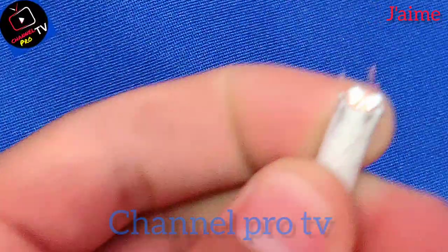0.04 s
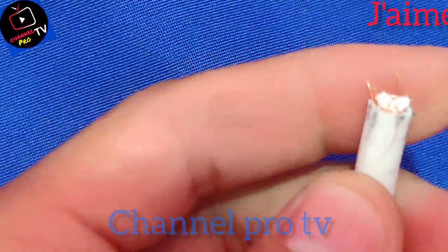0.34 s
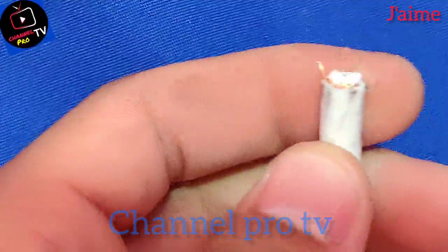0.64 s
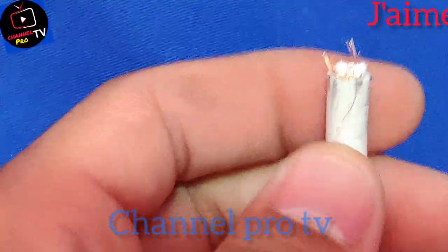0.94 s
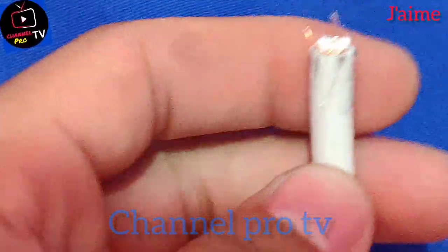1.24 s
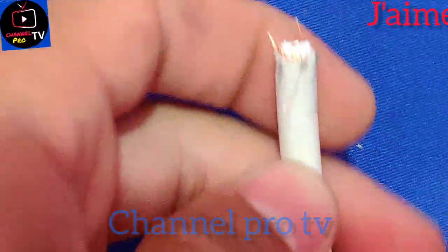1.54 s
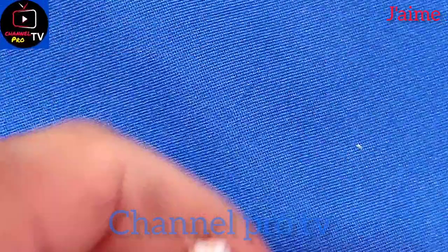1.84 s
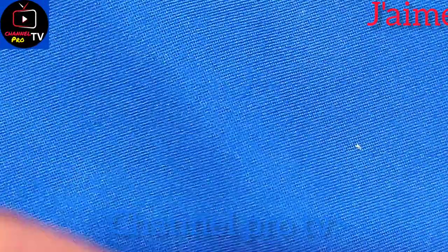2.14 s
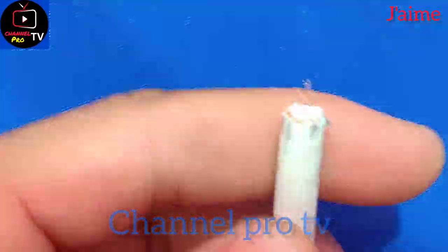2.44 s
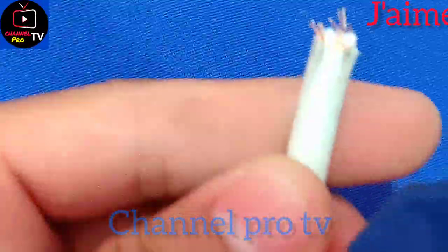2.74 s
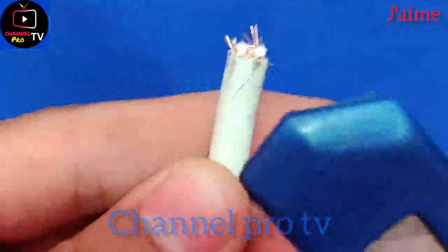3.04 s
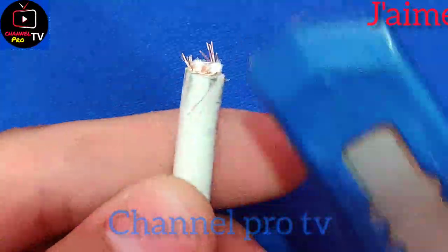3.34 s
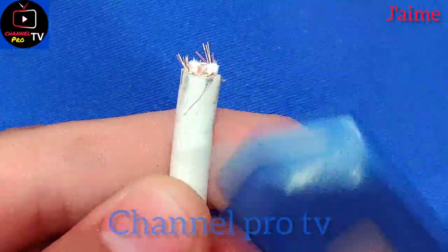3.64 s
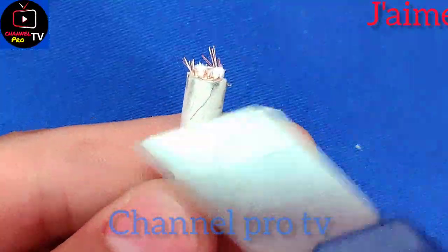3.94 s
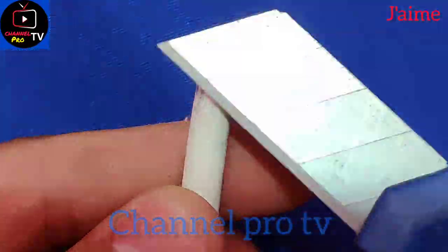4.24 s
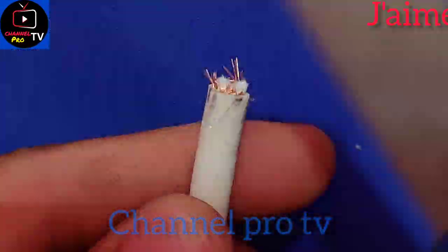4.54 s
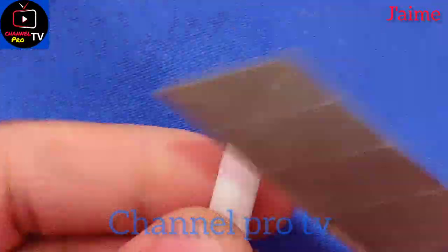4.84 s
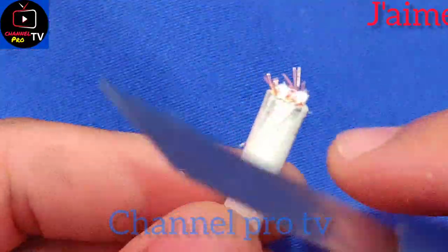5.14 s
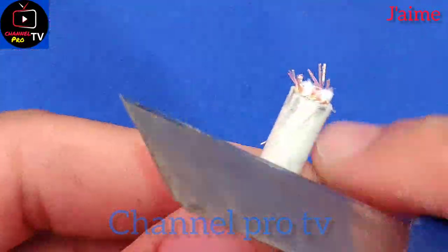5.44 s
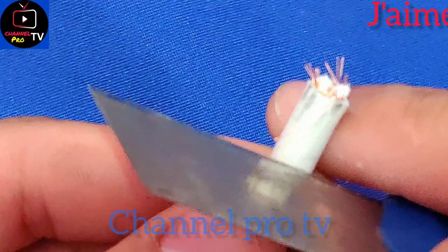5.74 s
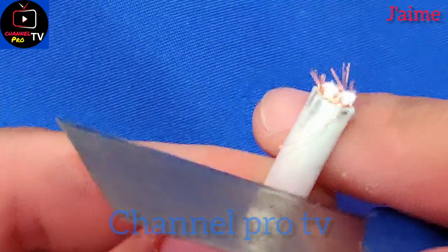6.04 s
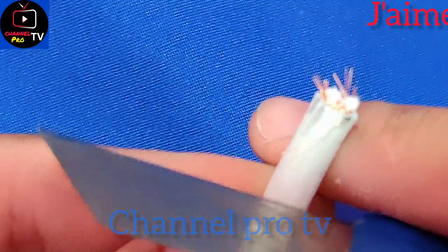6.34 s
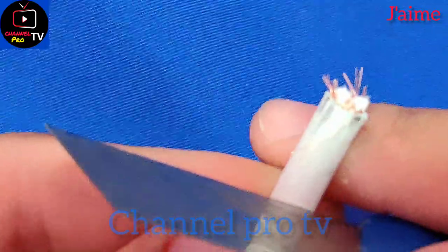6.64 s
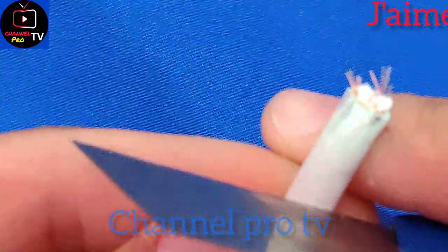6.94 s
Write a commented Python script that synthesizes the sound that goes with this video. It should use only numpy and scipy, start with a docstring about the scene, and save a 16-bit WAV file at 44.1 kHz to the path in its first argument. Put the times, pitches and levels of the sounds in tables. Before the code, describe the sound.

Hands softly rub and bump as they turn a cable over a cloth-covered table. A plastic snap-off knife is picked up with light ticks and one sharp knock. Its blade is pushed out in a run of loud, uneven ratcheting clicks, then gives a few faint ticks against the cable's jacket. Everything is close to the microphone in a quiet room with soft hiss and low hum.

```python
"""Hands softly rub and bump as they turn a coaxial cable over a cloth-covered table, close by in a quiet room.
A plastic snap-off knife is picked up with light ticks and one sharp knock. Its blade is pushed out in
loud ratcheting clicks: the slider's catch slips off each tooth and snaps into the next notch, ringing
the handle. Then the blade scores the cable's jacket with a few faint ticks.
Underneath lie a soft hiss, a mains hum and the low rumble of handling."""
import sys
import numpy as np
from scipy import signal
from scipy.fft import rfft, irfft, next_fast_len
from scipy.io import wavfile
from scipy.ndimage import uniform_filter1d

SR = 44100
rng = np.random.default_rng(int(sys.argv[2]) if len(sys.argv) > 2 else 0)


def file_out(sig):
    """Save sig as 16-bit WAV at sys.argv[1]."""
    # one column per channel
    cols = np.atleast_2d(sig).T
    # limit, then scale
    lim = np.clip(cols, -1, 1)
    pcm = np.round(lim * 32767).astype(np.int16)
    wavfile.write(sys.argv[1], SR, pcm)


N = 312669
TIME = np.arange(N) / SR

# the tone colour (strength from bass to treble) of a light touch: pitch_hz, level_db
TOUCH_COLOUR = [(200, -5), (600, -14), (1000, -13), (1500, -4.5), (2200, -3.5), (3000, -1), (4000, 2.5),
                (5500, -3), (7500, -1), (10000, -8.5), (12500, -12.5), (15500, -14)]
# the tone colour of the handling rumble: pitch_hz, level_db
RUMBLE_COLOUR = [(8, 7), (22, -13), (38, -4), (70, -3.5), (110, -11), (280, -15.5), (400, -25.5),
                 (1000, -36.5), (4000, -60)]
# how alike left and right are for close sounds: pitch_hz, likeness (1 = the same)
NEAR_LIKENESS = [(200, 0.96), (1000, 0.56), (2500, 0.49), (4500, 0.18), (7000, .25), (15000, 0.22)]
# how alike they are for the background: pitch_hz, likeness
AIR_LIKENESS = [(40, 0.53), (150, 0.93), (400, .5), (1000, 0.29), (3000, .1), (15000, .1)]


def slider(level_db, top_pan_db, room_db):
    """The slider ratchets along the handle; the highest part of its snaps beams to the left."""
    # the tone colour of a snap: pitch_hz, level_db
    colour = [(110, -12.5), (220, -11), (370, -27), (600, -29), (1000, -14.5), (1500, -3), (2200, -.6),
              (3000, -.3), (4000, 0.5), (5500, -0.5), (7500, 3), (10000, -1), (12500, -3), (15500, -5)]
    near, spread = clicks(notch_contacts(), colour, rise_ms=0.11, ring_width_hz=300,
                          scrape_db=-20, scrape_ms=1.3)
    padded = next_fast_len(N)
    pan_db = at_hz([(8800, 0), (12500, top_pan_db)], np.fft.rfftfreq(padded, 1 / SR))
    spectrum = rfft(knife_body(near), padded)
    beamed = irfft(spectrum * from_db([pan_db / 2, -pan_db / 2]), padded)[:, :N]
    direct = from_db(level_db) * close_echoes(beamed, left_lag_ms=0.064)
    return direct, from_db(room_db) * knife_body(spread)


def notch_contacts():
    """At each notch the catch slips off a tooth, snaps into place and bounces back once."""
    # the notches: slip_s, slip_db, slip_decay_ms, snap_s, snap_db, snap_decay_ms,
    # bass_db, treble_db, ring_hz, ring_db, pan_db (above 0 is left)
    notches = [(3.573, -11, 2.6, 3.583, -10.5, 2.4, -2.5, -3.5, 6030, 7.5, -5.5),
               (3.7149, -10.5, 1, 3.7189, -11.5, 3.07, -1, .5, 7240, 9, -0.5),
               (3.7366, -20, 4.7, 3.7394, -15, 3.8, -4, 0, 7150, 5.5, -4.5),
               (3.798, -31, 5, 3.8041, -13.5, 4.54, -2, 2.5, 7130, 9, -3),
               (3.93, -25, 5.8, 3.9345, -8.5, 3.36, -6.5, 1, 7550, 8.5, -5.5),
               (4.1413, -17.5, 10.6, 4.153, -13.5, 7, -.5, -.5, 3000, 7, -2),
               (4.2588, -14.5, 3.6, 4.268, -13.5, 5.2, -1, 2.5, 2740, 9, -3.5),
               (4.273, -8.5, 2.45, 4.2761, -10.5, 2.2, -2.5, 1, 2520, 5, -7),
               (4.3265, -32.5, 2, 4.3281, -14, 1.34, -3, 3.5, 4740, 14, -7.5),
               (4.3806, -19, 1.5, 4.3886, -14, 5.2, -3, 2.5, 3900, 8, -8.5)]
    handle_ring_hz, handle_ring_db = 2950, 7
    contacts = []
    for slip_s, slip_db, slip_ms, snap_s, snap_db, snap_ms, *tone in notches:
        bass_db, treble_db, _, _, pan_db = tone
        # the bounce is weaker and duller, and rings the handle
        bounce_s = snap_s + 1.2 * snap_ms / 1000
        bounce_tone = (bass_db, treble_db - 5, handle_ring_hz, handle_ring_db, pan_db)
        contacts += [(slip_s, slip_db, slip_ms, *tone),
                     (snap_s, snap_db, snap_ms, *tone),
                     (bounce_s, snap_db - 10.5, snap_ms, *bounce_tone)]
    return contacts


def knife_body(sound):
    """Snaps ring on in the handle and the blade."""
    # the knife's own notes: pitch_hz, width_hz, level_db
    rings = [(2334, 150, 1), (2885, 63, -1.5), (3520, 45, -3.5), (3890, 31, -15), (5090, 73, -4),
             (6660, 45, -11), (7280, 160, -5.5), (8300, 80, 1.5), (10200, 73, -5)]
    return sound + sum(from_db(db) * resonate(sound, hz, width_hz) for hz, width_hz, db in rings)


def knife_lift(room_db):
    """The knife gives one sharp knock as it is lifted."""
    # the knock's two contacts: start_s, level_db, decay_ms, bass_db, treble_db, ring_hz, ring_db, pan_db
    contacts = [(2.6342, -34, 12, 3.5, 8, 4700, 1.5, 0), (2.6391, -16.5, 2.2, -8, 7, 4050, 9, 2)]
    # the tone colour of the knock: pitch_hz, level_db
    colour = [(200, -14.5), (550, -34), (850, -12.5), (1150, -11.5), (1900, -9.5), (3000, -3.5), (5000, 0),
              (6500, -2), (8300, 3), (9400, -7), (12500, -18), (14200, -13), (16000, -22)]
    near, spread = clicks(contacts, colour, rise_ms=0.19, ring_width_hz=100, scrape_db=-13, scrape_ms=1)
    return close_echoes(near, left_lag_ms=0.024), from_db(room_db) * spread


def touches(level_db, room_db):
    """The knife ticks as it is picked up, gripped and set on the cable; brighter ticks have less bass."""
    # touches of fingers, knife and cable:
    # start_s, level_db, decay_ms, brightness_db, ring_hz, ring_db, pan_db
    ticks = [(1.586, -46.5, 11, 3, 3170, 16, -1), (1.744, -47, 6.9, -3.5, 3120, 8, -2),
             (1.7735, -41, 5.8, -1.5, 3050, 5, -1), (1.8415, -39, 10, 5, 4260, 15, 3),
             (1.8505, -36.5, 8.6, 2.5, 2720, 10.5, -2), (2.0965, -33.5, 6.2, 1.5, 8060, 8.5, -1.5),
             (2.2226, -36, 3.4, 5, 5000, 18.5, -1), (3.2, -41, 3.5, -2, 3600, 15, 5),
             (3.258, -47.5, 2.2, 1, 5300, 13, 7), (3.308, -48.5, 3.5, -1, 6170, 2, 5),
             (3.409, -52, 2.7, -6, 3600, 15.5, 3), (3.47, -41, 9, 0.5, 2860, 10.5, 1),
             (3.987, -27.5, 3.1, 6, 7500, 2, -8), (4.021, -33, 7.3, 1, 2100, 10.5, -8),
             (4.42, -30, 3.3, 2, 4130, 10, -13.5), (4.52, -39, 4.7, 5, 2150, 13.5, -3),
             (4.775, -32, 2.6, 4.5, 5700, 14.5, -.5), (4.9628, -37.5, 6.5, -0.5, 7460, 9.5, 3),
             (5.019, -49, 4.3, -6, 2470, 9, 5), (5.081, -51.5, 4.2, 4, 3780, 10.5, 0),
             (5.488, -55.5, 3.2, -1, 8700, 16, 2), (5.611, -49, 5.5, 0, 2460, 16, 4),
             (6.089, -58, 4.5, -7, 3250, 19, 0.5), (6.464, -59, 4.5, -5, 2788, 11, 1)]
    contacts = [(start_s, db, decay_ms, -bright_db, bright_db, *ring_and_pan)
                for start_s, db, decay_ms, bright_db, *ring_and_pan in ticks]
    near, spread = clicks(contacts, TOUCH_COLOUR, rise_ms=0.56, ring_width_hz=296,
                          scrape_db=-15.5, scrape_ms=4.5)
    return from_db(level_db) * blade_ring(near), from_db(room_db) * spread


def blade_ring(sound, grip_s=2.3, grip_db=-12):
    """Light touches leave thin rings in the blade, weaker once the hand closes round the knife."""
    # the free blade's notes: pitch_hz, width_hz, level_db
    rings = [(2770, 6, 10), (3080, 12, 12), (4030, 30, 2), (8200, 6, 9)]
    shaking = sound * from_db(grip_db * (TIME > grip_s))
    return sound + sum(from_db(db) * resonate(shaking, hz, width_hz) for hz, width_hz, db in rings)


def clicks(contacts, colour, rise_ms, ring_width_hz, scrape_db, scrape_ms):
    """Each contact scrapes briefly, then snaps. Returns the close sound and the sound sent to the room."""
    # where bass and treble changes act: bass_full_hz, bass_end_hz, treble_start_hz, treble_full_hz
    corners_hz = [2200, 3420, 8500, 10500]
    near, spread = np.zeros((2, 2, N))
    for snap_s, level_db, decay_ms, bass_db, treble_db, ring_hz, ring_db, pan_db in contacts:
        tilt = list(zip(corners_hz, [bass_db, 0, 0, treble_db]))
        # a burst played backwards swells into the snap
        scrape = from_db(scrape_db) * burst(colour, scrape_ms, rise_ms, tilt)[:, ::-1]
        snap = burst(colour, decay_ms, rise_ms, tilt)
        hit = from_db(level_db) * np.hstack([scrape, snap])
        start_s = snap_s - scrape.shape[1] / SR
        add(spread, start_s, hit)
        # the grip and the blade's position point one ring at the microphone
        hit = hit + (from_db(ring_db) - 1) * resonate(hit, ring_hz, ring_width_hz)
        add(near, start_s, hit * from_db([[pan_db / 2], [-pan_db / 2]]))
    return near, spread


def burst(colour, decay_ms, rise_ms, tilt=None):
    """A contact starts many vibrations at once; they die in milliseconds, the highest first."""
    ms = np.arange(4096) / SR * 1000
    hz = np.fft.rfftfreq(len(ms), 1 / SR)
    attack = 1 - np.exp(-ms / rise_ms)
    envelope = attack * np.exp(-ms / decay_ms)
    top_envelope = attack * np.exp(-ms / (0.62 * decay_ms))
    top_share = at_hz([(8000, 0), (11500, 1)], hz)
    vibrations = noise(colour, NEAR_LIKENESS, size=len(ms))
    ring = (1 - top_share) * rfft(vibrations * envelope) + top_share * rfft(vibrations * top_envelope)
    # share the blow's energy from bass to treble according to the tone colour
    wanted_power = from_db(2 * at_hz(colour, hz))
    wanted_power = wanted_power / wanted_power.mean() * np.sum(envelope ** 2)
    ring_power = uniform_filter1d(np.abs(ring) ** 2 + 1e-12, size=161)
    gain = np.sqrt(uniform_filter1d(wanted_power, size=161) / ring_power)
    gain = uniform_filter1d(gain, size=81) * from_db(at_hz(tilt, hz) if tilt else 0)
    return irfft(ring * gain, len(ms)) * (ms < ms[-1] / 2)


def table_bumps(ring_db, ring_width_hz):
    """The cloth softens knocks on the table to dull thuds."""
    # the soft knocks: start_s, level_db, decay_ms, ring_hz
    bumps = [(0.9845, -44, 7.5, 800), (1.126, -45, 6, 700), (1.8055, -44.5, 10.3, 284)]
    # the tone colour of a thud: pitch_hz, level_db
    colour = [(80, -2), (270, 3), (600, -4.5), (950, -1.5), (1250, -18.5), (3000, -24), (15000, -36)]
    out = np.zeros((2, N))
    for start_s, level_db, decay_ms, ring_hz in bumps:
        thud = burst(colour, decay_ms, rise_ms=0.25)
        ring = from_db(ring_db) * resonate(thud, ring_hz, ring_width_hz)
        add(out, start_s, from_db(level_db) * (thud + ring))
    return out


def rubbing(flicker_db, slips_per_s, hiss_db, grit_db):
    """Skin and plastic slide on cloth and cable in tiny slips and catches, louder as they move faster."""
    # strokes that swell and fade: peak_s, rise_s, fall_s, level_db
    strokes = [(.12, 0.18, .17, -62), (1.7, 0.053, .035, -57), (1.85, .06, .045, -49),
               (2.1, .07, .09, -63.5), (2.56, 0.14, .08, -67), (3.1, .1, .07, -66), (3.35, .08, .08, -71),
               (3.82, .07, .09, -48), (4.025, .035, .03, -41.5), (4.36, 0.07, .03, -52),
               (4.49, 0.028, .04, -49), (4.76, .045, .04, -59)]
    # the tone colour of the sliding hiss: pitch_hz, level_db
    colour = [(200, -22.5), (1000, -5.5), (2000, -1.5), (3200, -3.5), (5000, -1), (6500, -9), (8300, -7),
              (11000, -9.5), (16000, -6)]
    speed = sum(from_db(db) * np.exp(-np.maximum((peak_s - TIME) / rise_s, (TIME - peak_s) / fall_s))
                for peak_s, rise_s, fall_s, db in strokes)
    hiss = from_db(hiss_db + flicker_db * drift(slips_per_s)) * noise(colour, NEAR_LIKENESS)
    catches = from_db(grit_db) * grit(catches_per_s=170, spread_db=8, decay_ms=2.2, spots=5)
    return speed * (hiss + catches)


def grit(catches_per_s, spread_db, decay_ms, spots):
    """Sliding surfaces catch at random on a few spots, each ringing like a light touch."""
    out = 0
    for _ in range(spots):
        caught = rng.random(N) < catches_per_s / spots / SR
        catches = caught * from_db(spread_db * rng.uniform(-1, 1, N))
        tick = burst(TOUCH_COLOUR, decay_ms, rise_ms=0.3)
        out = out + signal.fftconvolve(catches[None], tick, axes=1)[:, :N]
    return out / out.std()


def hand_thrums(fade_s):
    """Shifting hands stir up a low drone for a moment."""
    # the drones: start_s, end_s, pitch_hz, width_hz, level_db
    thrums = [(-.05, .45, 45, 137, -60), (-.05, .42, 480, 500, -69), (4.07, 4.32, 100, 140, -61.5),
              (5.133, 5.302, 79, 14.2, -54.5), (5.58, 6.019, 40, 90, -62), (5.6, 5.78, 360, 260, -68),
              (6.903, 7.119, 65.6, 11.4, -56.5)]
    out = np.zeros((2, N))
    stir = noise(RUMBLE_COLOUR, AIR_LIKENESS)
    for start_s, end_s, hz, width_hz, level_db in thrums:
        thrum = resonate(resonate(stir, hz, width_hz), hz, width_hz)
        fade = np.clip(np.minimum(TIME - start_s, end_s - TIME) / fade_s, 0, 1)
        out += from_db(level_db) * thrum / thrum.std() * fade
    return out


def close_echoes(sound, left_lag_ms):
    """Hand and table throw sound back; the knife is on the right, so the left side hears it later."""
    # echoes off the hand and the table: delay_ms, level_db
    echoes = [(1.002, -18), (2.701, -18)]
    left, right = [side + sum(from_db(db) * delayed(side, ms) for ms, db in echoes) for side in sound]
    return np.array([delayed(left, left_lag_ms), right])


def room_echo(sound, first_echo_s):
    """The walls blur the sound into a short tail, in which the bass lasts longest."""
    # the tone colour of the tail: pitch_hz, level_db
    colour = [(200, -4.5), (700, -0.5), (1300, -3), (2600, 4.5), (4500, 2), (8000, -3.5), (15000, 0.5)]
    # how long the tail takes to fall by 60 dB: pitch_hz, fade_s
    fade_times = [(200, .45), (1500, 0.24), (4000, 0.36), (8000, .36), (15000, 0.26)]
    t = TIME[:SR * 3 // 4]
    edges_hz = np.geomspace(150, 18000, 9)
    tail = 0
    for low_hz, high_hz in zip(edges_hz, edges_hz[1:]):
        hz = np.sqrt(low_hz * high_hz)
        band_filter = signal.butter(2, [low_hz, high_hz], "band", fs=SR, output="sos")
        band = signal.sosfilt(band_filter, rng.standard_normal((2, len(t))))
        tail = tail + band * from_db(at_hz(colour, hz) - 60 * t / at_hz(fade_times, hz))
    tail = tail * np.clip(t / first_echo_s - 1, 0, 1)   # builds up after the first echo
    tail = tail / np.sqrt(np.sum(tail ** 2) / 2)
    both_sides = sound.sum(axis=0, keepdims=True) / np.sqrt(2)
    return signal.fftconvolve(both_sides, tail, axes=1)[:, :N]


def room_tone(hiss_db, rumble_db, swing_db, hum_db, hum_hz):
    """Steady hiss, a mains hum and the slowly swelling rumble of handling."""
    # the tone colour of the quiet room: pitch_hz, level_db
    colour = [(12, -3), (28, -18), (60, -9.5), (110, -23), (190, -23), (270, -21.5), (360, -28), (560, -29),
              (850, -29), (1200, -34.5), (2750, -37.5), (4940, -43.5), (8000, -46), (15000, -44)]
    hiss = from_db(hiss_db) * noise(colour, AIR_LIKENESS)
    rumble = from_db(rumble_db + swing_db * drift(turns_per_s=2)) * noise(RUMBLE_COLOUR, AIR_LIKENESS)
    hum = from_db(hum_db) * np.sqrt(2) * np.sin(2 * np.pi * hum_hz * TIME)
    return hiss + rumble + hum


def noise(colour, likeness, size=N):
    """Stereo noise with a given tone colour and likeness between left and right."""
    padded = next_fast_len(size, real=True)
    hz = np.fft.rfftfreq(padded, 1 / SR)
    gain = from_db(at_hz(colour, hz))
    gain = gain / np.sqrt(np.mean(gain ** 2))
    alike = np.clip(at_hz(likeness, hz), -1, 1)
    shared, opposite = rfft(rng.standard_normal((2, padded)))
    stereo = np.sqrt((1 + alike) / 2) * shared + np.sqrt((1 - alike) / 2) * opposite * [[1], [-1]]
    return irfft(gain * stereo, padded)[:, :size]


def resonate(sound, hz, width_hz):
    """Let a sound ring at one pitch; a narrower width rings longer."""
    radius = np.exp(-np.pi * width_hz / SR)
    feedback = [1, -2 * radius * np.cos(2 * np.pi * hz / SR), radius ** 2]
    return signal.lfilter(np.array([1, 0, -1]) * (1 - radius ** 2) / 2, feedback, sound + 1e-18)


def drift(turns_per_s):
    """A value that wanders at random, mostly between -1 and 1."""
    points = rng.standard_normal(int(N / SR * turns_per_s) + 2)
    return np.interp(TIME * turns_per_s, np.arange(len(points)), points)


def delayed(channel, ms):
    """One channel, later by some milliseconds."""
    return np.interp(TIME - ms / 1000, TIME, channel)


def add(track, start_s, sound):
    """Mix a sound into a track at a given time."""
    start = int(start_s * SR)
    track[:, start:start + sound.shape[1]] += sound[:, :N - start]


def at_hz(points, hz):
    """Read a table at any pitch, gliding between its rows with octaves evenly spaced."""
    known_hz, values = np.transpose(points)
    return np.interp(np.log(np.maximum(hz, 1)), np.log(known_hz), values)


def from_db(db):
    """Turn decibels into a volume factor."""
    return 10 ** (np.asarray(db) / 20)


def scene():
    """Knife and hands near the microphone, with the room behind them."""
    knife_sounds = [slider(level_db=-1.5, top_pan_db=11, room_db=-15),
                    knife_lift(room_db=-19.5),
                    touches(level_db=-2, room_db=-11.5)]
    near, spread = np.sum(knife_sounds, axis=0)
    hands = table_bumps(ring_db=-1, ring_width_hz=98)
    hands += rubbing(flicker_db=3, slips_per_s=130, hiss_db=-2.5, grit_db=-3.5)
    echo = room_echo(spread + from_db(-7) * hands, first_echo_s=0.0045)
    background = room_tone(hiss_db=-59, rumble_db=-62, swing_db=1.34, hum_db=-65.5, hum_hz=51.4)
    return near + hands + hand_thrums(fade_s=0.039) + echo + background


def record(dry):
    """Round off only the loudest peaks, then cut the highest treble steeply."""
    ceiling, cutoff_hz = 0.88, 15900
    rounded = dry / (1 + (dry / ceiling) ** 6) ** (1 / 6)
    treble_cut = signal.ellip(10, 0.2, 80, cutoff_hz, fs=SR, output="sos")
    return signal.sosfilt(treble_cut, rounded)


dry = scene()
out = record(dry)
file_out(out)
```